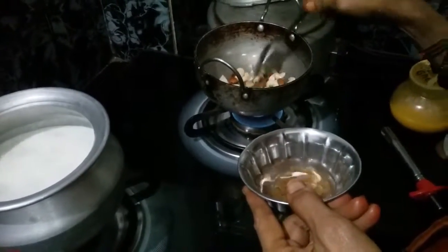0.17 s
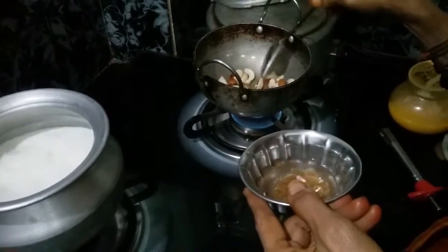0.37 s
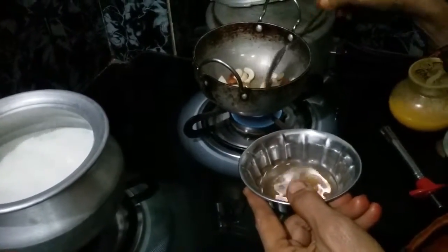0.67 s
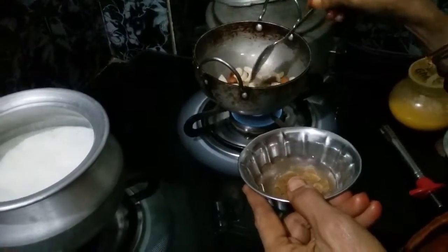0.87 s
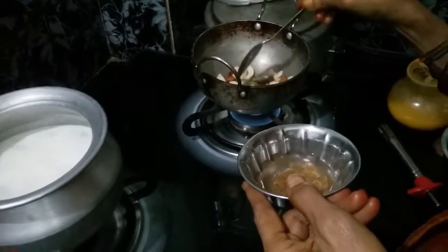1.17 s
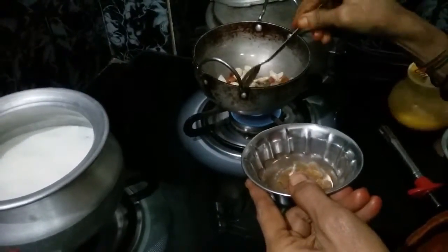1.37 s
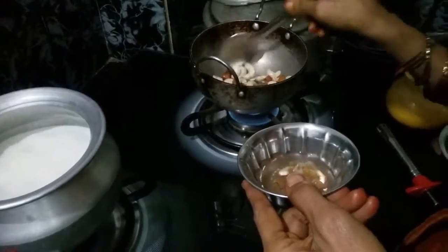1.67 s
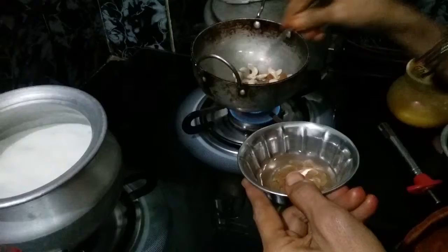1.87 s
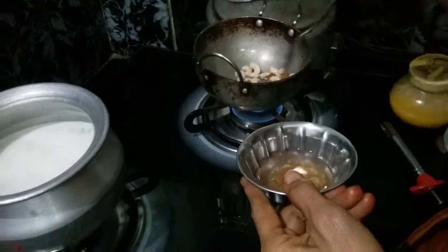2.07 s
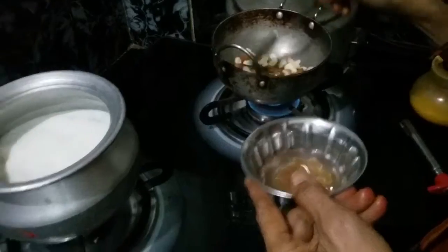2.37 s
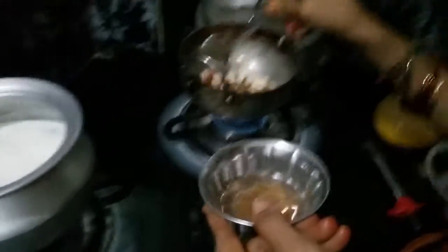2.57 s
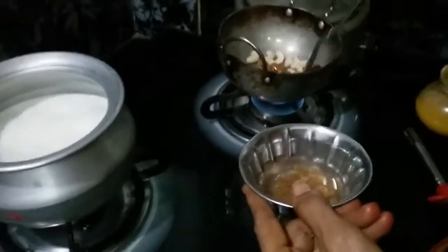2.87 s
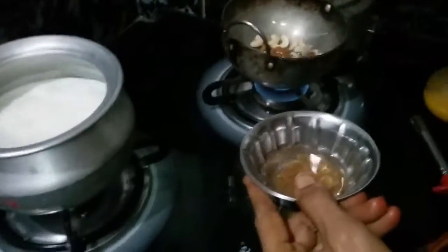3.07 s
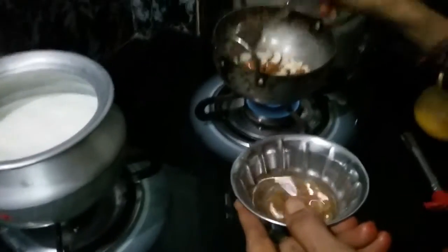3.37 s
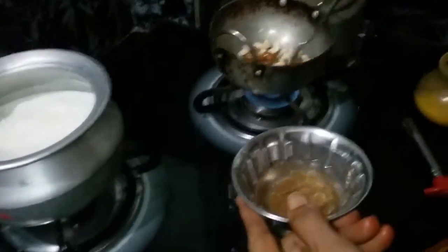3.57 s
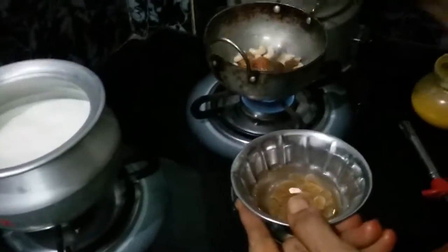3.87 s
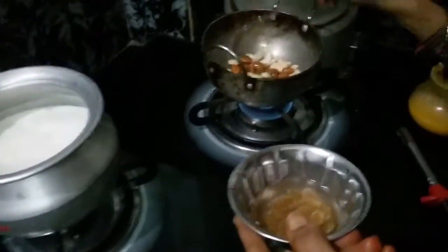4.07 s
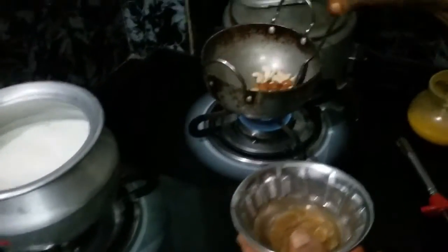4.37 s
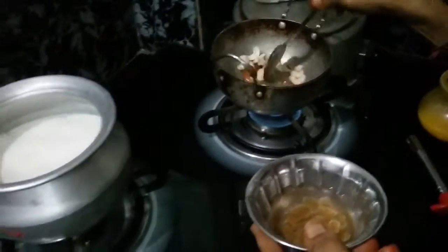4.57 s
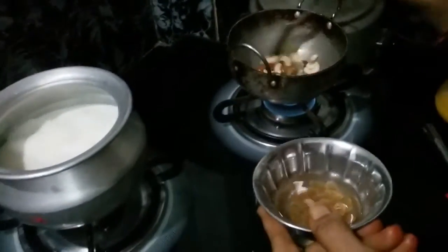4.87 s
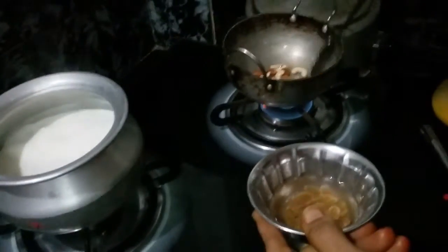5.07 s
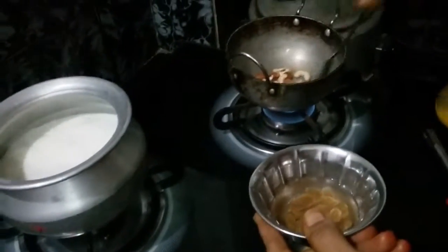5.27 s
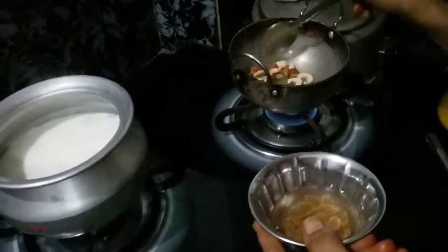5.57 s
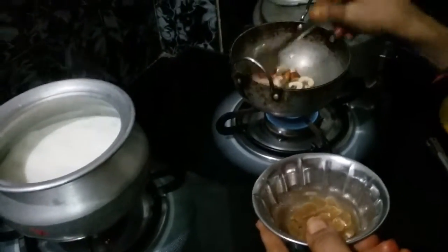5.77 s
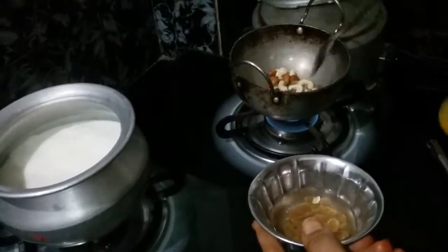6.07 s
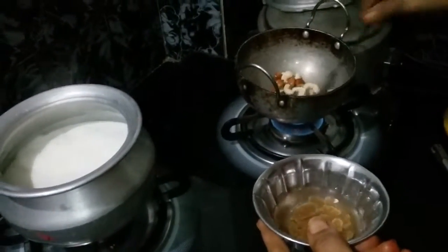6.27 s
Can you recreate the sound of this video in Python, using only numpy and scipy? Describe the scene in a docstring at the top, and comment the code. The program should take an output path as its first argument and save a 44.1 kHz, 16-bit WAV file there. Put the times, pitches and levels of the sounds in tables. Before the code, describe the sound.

Close up in a hard-walled kitchen, a spoon hits and drags in a thin metal pan. Sparse knocks at first, a quiet gap, then a long scrape, light wall taps, and steady muffled pushes into nuts, each often followed by a brief scrape. Some blows ring bright and thin. Behind them sit a barely audible burner hush and a very faint high whine.

```python
"""In a tiled kitchen, a steel spoon turns nuts in a small metal pan on a gas ring.
Knocks are short chattering forces that excite the pan's modes; many are followed by a scrape.
Scrapes are trains of tiny slips, dull on the metal and gritty from the tumbling nuts.
The spoon rings in beating pairs of tones, stick-slip squeaks and soft bumps are wavering tones.
Filtered noise makes the flame's hush and low flutter, and a sine a thin high electrical whine."""
import sys
import numpy as np
from scipy import signal
from scipy.fft import rfft, irfft, next_fast_len
from scipy.io import wavfile

SR = 44100
rng = np.random.default_rng(int(sys.argv[2]) if len(sys.argv) > 2 else 0)


def persist_wave(psi):
    """Save psi, clipped to +-1, as 16-bit WAV."""
    counts = np.round(np.clip(psi, -1, 1) * 32767).astype(np.int16)
    wavfile.write(sys.argv[1], SR, np.atleast_2d(counts).T)


N = 283122
TIME = np.arange(N) / SR  # s
TAIL = TIME[:int(0.7 * SR)]  # s, span of one answer of the pan

# Ranges in which a contact has its own strength, body, clank, ring, edge, sparkle: (low [Hz], high [Hz])
CONTACT_BANDS = [(130, 600), (600, 1500), (1500, 3500), (3500, 8000), (8000, 16000)]
# Ways the spoon meets the pan: flat bowl on metal, edge opening a sweep, muffled push into the nuts,
# glance off the wall, click of a nut:
# (body [dB], clank [dB], ring [dB], edge [dB], sparkle [dB], spoon resonance [Hz])
CONTACTS = { "flat": (-4.5, -1.5, -0.5, -6.5, -17, 2079.5), "edge": (-4, -2, -5.5, 1.5, -5.5, 1443),
            "muffled": (-5, -1.5, -11, -11.5, -18.5, 1820), "glance": (-10.5, -5.5, -1, -10, -21.5, 1900),
            "nut": (-15, -2, 2.5, 2.5, -1.5, 2895), }
# Knocks: (time [s], contact, relative level [dB], brightness [dB per octave], chatter decay T60 [s])
KNOCKS = [ (0.285, "muffled", -60, -5.5, 0.045), (0.325, "flat", -39.5, -1.1, 0.0048),
          (0.5445, "flat", -28, 0, .014), (0.8435, "flat", -26.5, -0.5, 0.017),
          (1.486, "muffled", -61, -4.5, 0.022), (1.7575, "edge", -34, -1, .012),
          (1.886, "nut", -56, 2.4, 0.043), (2.008, "glance", -39, -3.8, 0.0088),
          (2.089, "glance", -42, -2.8, 0.015), (2.298, "glance", -40, 3, 0.032),
          (2.323, "glance", -34.5, 4, 0.017), (2.6335, "edge", -32.5, 1, 0.013),
          (2.766, "nut", -60, 2.5, 0.017), (3.084, "glance", -38.5, 0.5, 0.011),
          (3.12, "glance", -42.5, 1.1, 0.0088), (3.158, "glance", -41, 0.3, 0.0029),
          (3.201, "muffled", -31, 0.5, 0.027), (3.43, "edge", -32.5, 0.2, 0.051),
          (3.561, "muffled", -31, -1.65, 0.017), (3.9635, "muffled", -28.5, 0.1, 0.029),
          (4.1925, "muffled", -29, 0.3, 0.034), (4.55, "nut", -64.5, 0.5, 0.02),
          (4.602, "muffled", -32, -1.05, 0.03), (4.889, "edge", -35, -0.2, 0.0082),
          (5.071, "nut", -60, 5.4, 0.038), (5.329, "edge", -29.5, 0.6, 0.034),
          (5.3875, "nut", -33.5, -1.9, 0.0025), (5.46, "muffled", -32, 1.5, 0.031),
          (5.7585, "edge", -36.5, 0.75, 0.0065), (5.974, "muffled", -38.5, -2, 0.022),
          (6.052, "nut", -42, -5.1, 0.0083), (6.304, "muffled", -32, 1.5, 0.0041),
          (6.313, "glance", -35.5, 3.4, 0.062)]
# Sweeps over the pan: (start [s], length [s], relative crest drag [dB], slack below crest [dB],
# relative initial grit [dB]); a negative slack presses harder than the crest
SWEEPS = [(1.78, 0.27, -30, 8.5, -34), (2.335, .085, -33, -4, -30.5), (2.655, .235, -29, 14, -34.5),
          (3.09, 0.13, -44, -1, -39), (3.185, 0.046, -35.5, -7.5, -31.5), (3.44, 0.032, -37, -3, -33),
          (3.57, 0.1, -30, -3.5, -30.5), (3.975, 0.035, -39, -6, -32.5), (4.61, 0.041, -44.5, 11, -28),
          (4.91, 0.17, -32.5, 1.5, -33), (5.36, .16, -35, -3.5, -31.5), (5.78, 0.28, -29.5, 12.5, -33)]
# Stick-slip squeaks: (time [s], length [s], frequency [Hz], relative level [dB])
SQUEAKS = [(3.565, 0.018, 994, -28), (3.67, 0.0092, 2740, -41), (4.195, .02, 917, -34),
           (4.605, 0.081, 1010, -46), (5.893, 0.011, 4020, -46), (5.94, 0.048, 5080, -63)]
# The spoon's own modes after a blow: (time [s], frequency [Hz], level [dB], decay T60 [s])
SPOON_MODES = [(1.758, 6710, -13.5, 0.048), (2.090, 3530, -35.5, 0.18), (2.298, 3500, -33.5, 0.25),
               (3.086, 3510, -38, 0.5), (5.331, 6560, -12, 0.087), (5.757, 6180, -29.5, 0.25),
               (6.314, 6550, -23.5, 0.11), (6.314, 3560, -33, 0.41)]
# Soft bumps of pan and stove: (time [s], length [s], frequency [Hz], relative level [dB])
BUMPS = [(.15, 0.013, 469, -67), (1.13, 0.022, 80.5, -62.5), (1.15, 0.0097, 255, -60.5),
         (1.15, 0.041, 677, -65.5), (1.265, 0.023, 675, -68), (1.50, 0.063, 277, -67.5),
         (3.42, 0.012, 91, -44), (3.86, 0.027, 257, -51), (6.16, 0.031, 269, -59)]
# The pan's strong modes: (frequency [Hz], relative level [dB], decay T60 [s])
PAN_MODES = [(264.5, 7, 0.42), (305.8, -0.5, 0.54), (343.5, -1.5, 0.51), (435.9, 1.5, 0.26),
             (582.6, -2, 0.18), (666.5, -10, 0.45), (773, 4.5, 0.25), (853, -15.5, 1), (829, -8.5, 0.63),
             (914, 10.5, 0.1), (990, 4.5, 0.11), (969, -1, 0.42), (1125, 2.5, 0.2), (1392, -7, 0.33),
             (1423, 0, 0.055), (1698, -4.5, 0.15), (1797, -2.5, 0.19), (1860, 3, 0.087), (2045, -4, 0.1),
             (2713, 3.5, 0.21), (2884, -2, 0.37), (3850, 1, .2), (4700, -22, 0.21), (4995, 2, 0.26),
             (7170, -6, 0.14), (8500, -10, 0.3), (11200, -2, .2), (13600, -18.5, .2)]
# The pan's crowd of weaker modes: (frequency [Hz], relative spectral level [dB])
WEAK_MODES = [(100, -24.5), (190, 2), (280, 0.5), (520, -3.5), (1000, -2), (1270, -7.5), (1550, -10),
              (1950, -10), (2400, -5), (2850, -2.5), (3500, -9.5), (6800, -3.5), (8800, -17), (15000, -9.5)]
# Reverberation of the room: (frequency [Hz], decay T60 [s])
ROOM_DECAY = [(150, 0.53), (300, 0.44), (800, 0.5), (2000, 0.39), (5000, 0.35), (13000, 0.41)]
# Likeness of the two ears: (frequency [Hz], left-right correlation [1])
EAR_CORRELATION = [(100, 0.54), (300, 0.98), (600, 0.45), (1000, 0.016), (15000, 0.082)]
# Balance of the two ears: (frequency [Hz], left minus right [dB])
EAR_BALANCE = [(100, -1), (300, 2), (800, -2.5), (1700, 0.5), (2800, -1), (4500, -4), (7200, -3), (9500, 8),
               (14000, 0.5)]
# Spectrum of the drag on metal: (frequency [Hz], gain [dB])
DRAG_SPECTRUM = [(100, -17), (300, 5.5), (1000, 5), (2000, 9.5), (3200, -9.5), (5000, -58), (15000, -17)]
# Spectrum of the grit: (frequency [Hz], gain [dB])
GRIT_SPECTRUM = [(500, 2.5), (2000, -7.5), (3800, -3.5), (7000, -8), (10000, -7), (15000, -17.5)]
# Scrape resonances that shift as the spoon travels over the pan:
# (first centre [Hz], last centre [Hz], width [Hz], first gain [dB], last gain [dB])
MOVING_RESONANCES = [(1380, 970, 90, 5, 3), (2150, 1780, 220, 1, 7), (2750, 2950, 180, -12, -2)]
# Spectrum of flame and room hush: (frequency [Hz], relative spectral level [dB])
FLAME_SPECTRUM = [(15, -61), (25, -12), (49, -19), (64, -21), (86, -12), (109, -5), (231, -17.5),
                  (264, -16.5), (673, -16.5), (1350, -27), (5010, -35), (6900, -25), (8320, -36.5),
                  (13500, -35.5), (15000, -42.5)]
# The burner's flutter: (time [s], level [dB])
FLUTTER_LEVEL = [(0, -66), (1.1, -66.5), (2.3, -67.5), (3.2, -61.5), (4.5, -59.5), (5.7, -57), (6.4, -64)]
# The electrical whine: (time [s], level [dB])
WHINE_LEVEL = [(0, -73), (1.2, -72), (2.4, -63), (6.4, -61)]

# A sweep lands, reaches its slack, climbs or falls to its crest up the far wall, then eases off
SLACK_SHARE, CREST_SHARE = 0.15, 0.86  # fraction of the sweep
LANDING_DB, EASING_DB = 1, -10  # drag at start and end, against the crest
GRIT_FADE_DB_PER_S = 9  # the nuts roll clear of the spoon
DRAG_SLIPS_PER_S, NUT_TICKS_PER_S = 590, 300  # mean rates
FLAME_DB = -61.5
CUTOFF_HZ = 15900


def from_db(db):
    """Decibel law: level to amplitude ratio."""
    return 10 ** (np.asarray(db) / 20)


def rms_one(x):
    """Normalisation to unit root mean square."""
    return x / np.sqrt(np.mean(x ** 2) + 1e-20)


def at_hz(points, hz):
    """Linear interpolation of a table over logarithmic frequency."""
    table = np.array(points)
    return np.interp(np.log(hz + 1e-9), np.log(table[:, 0]), table[:, 1])


def dying(t60, t=TAIL):
    """Exponential damping: a fall of 60 dB in t60 seconds."""
    return np.exp(-np.log(1000) * t / max(t60, 1e-4))


def band(x, low, high, order=3):
    """Causal band-pass filtering (Butterworth)."""
    sos = signal.butter(order, [low, high], "band", fs=SR, output="sos")
    return signal.sosfilt(sos, x + 1e-18)


def colour(x, points):
    """Spectral shaping: multiplication in the frequency domain."""
    size = x.shape[-1]
    padded = next_fast_len(size)
    hz = np.fft.rfftfreq(padded, 1 / SR)
    return irfft(rfft(x, padded) * from_db(at_hz(points, hz)), padded)[..., :size]


def glide(x, hz, width):
    """Heterodyning: a one-pole resonance follows a moving centre, with gain 1 at its peak."""
    turning = np.exp(2j * np.pi * np.cumsum(hz) / SR)
    r = np.exp(-np.pi * width / SR)
    return 2 * np.real(turning * signal.lfilter([1 - r], [1, -r], x / turning))


def add(out, s, x):
    """Superposition: mix x in at time s."""
    at = max(round(s * SR), 0)
    out[..., at:at + x.shape[-1]] += x[..., :N - at]


def ear_phase(hz):
    """Phase correlation: the angle between ears whose cosine is their correlation."""
    return np.arccos(np.clip(at_hz(EAR_CORRELATION, hz), -1, 1))


def stereo_noise(points, size):
    """Interaural coherence: sum and difference of two noises give each frequency its likeness."""
    padded = next_fast_len(size)
    hz = np.fft.rfftfreq(padded, 1 / SR)
    mid, side = rfft(rng.standard_normal((2, padded)))
    alike = np.clip(at_hz(EAR_CORRELATION, hz), -1, 1)
    sign = np.array([[1], [-1]])  # left, right
    both = np.sqrt(1 + alike) * mid + sign * np.sqrt(1 - alike) * side
    gain = from_db(at_hz(points, hz) + sign * at_hz(EAR_BALANCE, hz) / 2)
    return rms_one(irfft(both * gain, padded)[:, :size])


def pan_in_kitchen(modes_db=-13, crack_db=8, crack_t60=0.025, crack_db_per_octave=2.):
    """Impulse response: a crack, damped modes and room reverberation answer one touch; energy 1."""
    out = np.zeros((2, len(TAIL)))
    crowd = [stereo_noise(WEAK_MODES, len(TAIL)) for _ in range(2)]
    edges = np.geomspace(90, 18000, 10)  # Hz
    for k, (low, high) in enumerate(zip(edges, edges[1:])):
        hz = np.sqrt(low * high)
        tilt_db = crack_db_per_octave * np.log2(hz / 2000)
        crack = from_db(crack_db + tilt_db) * dying(crack_t60)
        reverberation = dying(at_hz(ROOM_DECAY, hz))
        # neighbouring bands take different noises
        out += band(crowd[k % 2], low, high) * np.hypot(crack, reverberation)
    for hz, db, t60 in PAN_MODES:
        # weakly correlated frequencies reach the two ears out of step
        apart = ear_phase(hz) * rng.choice([-1, 1])
        phase = rng.uniform(0, 2 * np.pi) + np.array([[0], [apart]])
        gain = from_db(db + modes_db + at_hz(EAR_BALANCE, hz) * np.array([[0.5], [-0.5]]))
        out += gain * dying(t60) * np.sin(2 * np.pi * hz * TAIL + phase)
    return out / np.sqrt(np.sum(out ** 2) / 2)


def knocks(spots, chatter=0.31, spoon_db=4, spoon_width=300, pivot_hz=1500):
    """Impact excitation: an impulse with decaying chatter strikes the pan; contact sets the spectrum."""
    out = np.zeros((2, N))
    brief = TIME[:int(0.03 * SR)]
    for k, (s, contact, db, brightness_db, chatter_t60) in enumerate(KNOCKS):
        *band_db, spoon_hz = CONTACTS[contact]
        force = chatter * rng.standard_normal(len(brief)) * dying(chatter_t60, brief)
        force[0] += 1  # first touch
        spoon = glide(force, np.full(len(brief), spoon_hz), spoon_width)
        force = force + from_db(spoon_db) * spoon
        sound = signal.fftconvolve(spots[k % len(spots)], force[None], axes=1)
        for (low, high), colour_db in zip(CONTACT_BANDS, band_db):
            part = band(sound, low, high, order=4)
            onset_level = np.std(part[:, :len(brief)])
            tilt_db = brightness_db * np.log2(np.sqrt(low * high) / pivot_hz)
            add(out, s, part * from_db(db + colour_db + tilt_db) / onset_level)
    return out


def slips(per_s, spread_db, rub):
    """Random point process: uneven jerks at random moments over a smooth rub."""
    size = len(TAIL)
    heights = from_db(spread_db * np.minimum(rng.exponential(1, size), 3))
    jerks = heights * rng.choice([-1, 1], size) * (rng.random(size) < per_s / SR)
    return rms_one(jerks) + rub * rng.standard_normal(size)


def dragging(progress):
    """Friction excitation: dull slips on metal pass through resonances that move with the spoon."""
    rub = colour(slips(DRAG_SLIPS_PER_S, spread_db=5.35, rub=0.12), DRAG_SPECTRUM)
    drag = rub.copy()
    for first_hz, last_hz, width, first_db, last_db in MOVING_RESONANCES:
        hz = first_hz + (last_hz - first_hz) * progress
        db = first_db + (last_db - first_db) * progress
        drag += from_db(db) * glide(rub, hz, width)
    return drag


def scraping(spots, drag_db=-0.5, grit_db=-7.0, lift_s=0.019):
    """Source-filter principle: drag and bright grit, each with its own pressure, excite the pan."""
    out = np.zeros((2, N))
    stages = [0, SLACK_SHARE, CREST_SHARE, 1]
    for k, (start, length, crest_db, slack_db, nuts_db) in enumerate(SWEEPS):
        pan = spots[k % len(spots)]
        touching = np.interp(TAIL, [length, length + lift_s], [1, 0])
        progress = np.minimum(TAIL / length, 1)
        pressing_db = crest_db + np.interp(progress, stages, [LANDING_DB, -slack_db, 0, EASING_DB])
        tumbling_db = nuts_db - GRIT_FADE_DB_PER_S * TAIL
        drag = dragging(progress)
        grit = colour(slips(NUT_TICKS_PER_S, spread_db=3.5, rub=0.75), GRIT_SPECTRUM)
        for force, force_db in (drag, pressing_db + drag_db), (grit, tumbling_db + grit_db):
            pressure = touching * from_db(force_db)
            # level of the same force at constant pressure
            unpressed = signal.fftconvolve(pan, force[None], axes=1)
            steady = np.std(unpressed[:, :int((length + 0.05) * SR)])
            add(out, start, signal.fftconvolve(pan, (force * pressure)[None], axes=1) / steady)
    return out


def spoon_rings(split=0.0059):
    """Beating: a blow sets off two damped spoon modes a small fraction apart in frequency."""
    out = np.zeros((2, N))
    for s, hz, db, t60 in SPOON_MODES:
        pair = np.zeros((2, len(TAIL)))
        for side in (-0.5, 0.5):
            phase = rng.uniform(0, 2 * np.pi, (2, 1))
            pair += np.sin(2 * np.pi * hz * (1 + side * split) * TAIL + phase)
        add(out, s, from_db(db) * dying(t60) * pair / 2)
    return out


def swells(rows, waver, room_t60, level_db, waver_hz):
    """Frequency modulation: wavering tones swell, hold, then decay in the room."""
    out = np.zeros((2, N))
    for s, length, hz, db in rows:
        noise = rng.standard_normal(len(TAIL))
        wander = rms_one(band(noise, waver_hz / 4, waver_hz * 2, order=1))
        phase = 2 * np.pi * np.cumsum(hz * (1 + waver * wander)) / SR
        tone = np.sin(phase + np.array([[0], [ear_phase(hz)]]))
        rise = np.minimum(TAIL / (length / 4), 1)
        linger = dying(room_t60, np.maximum(TAIL - length, 0))
        add(out, s, from_db(db + level_db) * rise * linger * rms_one(tone))
    return out


def squeaks():
    """Stick-slip oscillation: the spoon catches and frees itself at a nearly steady rate."""
    return swells(SQUEAKS, waver=0.023, room_t60=0.19, level_db=2, waver_hz=120)


def bumps():
    """Modal response to soft contact: pan and stove give short, gently rising tones."""
    return swells(BUMPS, waver=0.044, room_t60=0.29, level_db=8.5, waver_hz=41)


def flame_hush():
    """Broadband noise: steady shaped noise stands for the flame and the room."""
    return from_db(FLAME_DB) * stereo_noise(FLAME_SPECTRUM, N)


def burner_flutter(flutter_hz=89):
    """Narrow-band noise: a low band of noise fluctuates by itself and follows a slow level curve."""
    flutter = rms_one(band(rng.standard_normal(N), flutter_hz * 0.84, flutter_hz * 1.11, order=2))
    return flutter * from_db(np.interp(TIME, *np.transpose(FLUTTER_LEVEL)))


def electrical_whine(whine_hz=15600, left_db=-16):
    """Pure tone: a high sine with a slow level curve, mostly on the right."""
    level = from_db(np.interp(TIME, *np.transpose(WHINE_LEVEL)))
    whine = level * np.sin(2 * np.pi * whine_hz * TIME)
    return np.array([from_db(left_db) * whine, whine])


def scene(count=10):
    """Linear superposition of the sounds at the stove."""
    # each spot on the pan stirs the weaker modes in its own way
    spots = [pan_in_kitchen() for _ in range(count)]
    spoon_and_pan = knocks(spots) + scraping(spots) + spoon_rings() + squeaks() + bumps()
    return spoon_and_pan + flame_hush() + burner_flutter() + electrical_whine()


def record(dry):
    """Band limitation: a steep elliptic low-pass cuts the top."""
    low_pass = signal.ellip(10, 0.2, 80, CUTOFF_HZ, fs=SR, output="sos")  # ripple, stop band in dB
    return signal.sosfilt(low_pass, dry)


dry = scene()
out = record(dry)
persist_wave(out)
```